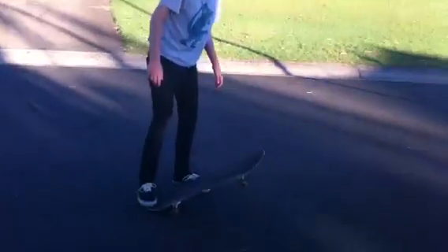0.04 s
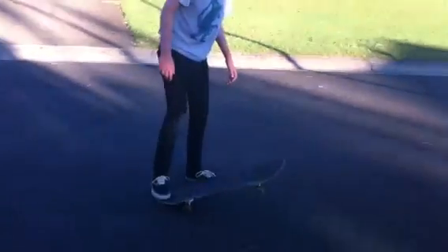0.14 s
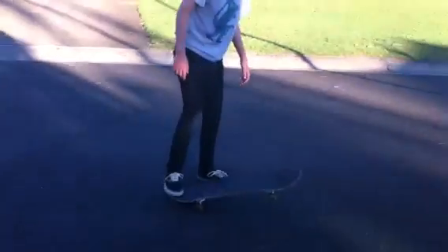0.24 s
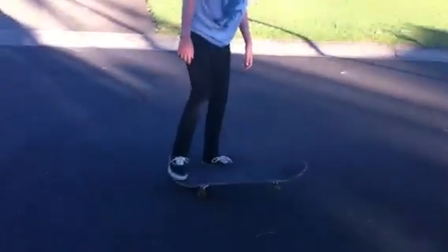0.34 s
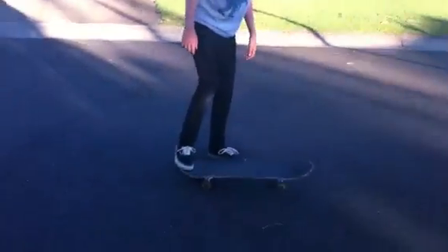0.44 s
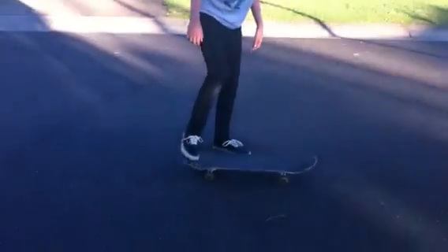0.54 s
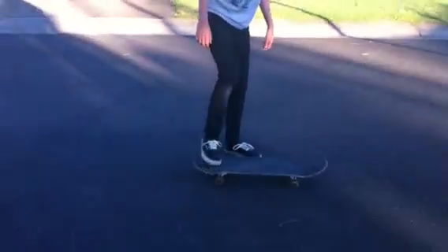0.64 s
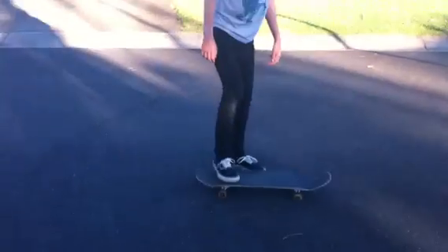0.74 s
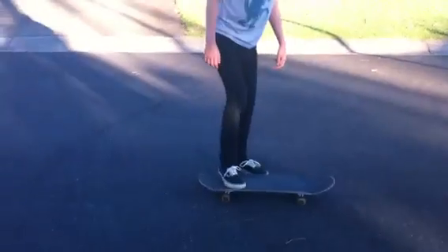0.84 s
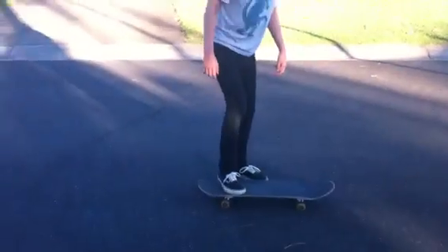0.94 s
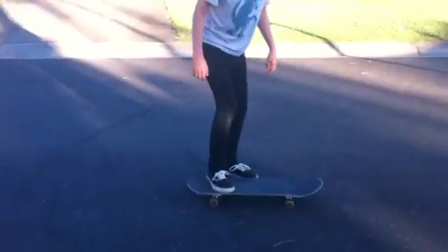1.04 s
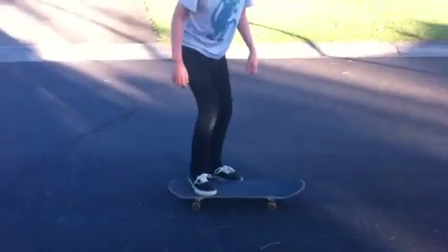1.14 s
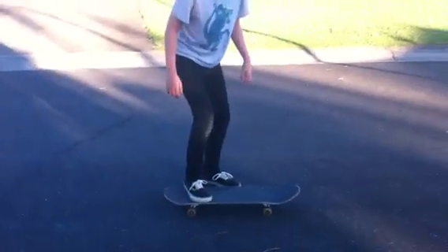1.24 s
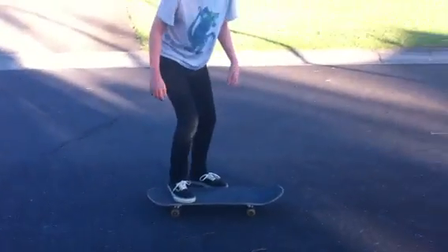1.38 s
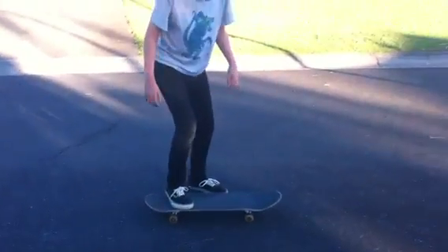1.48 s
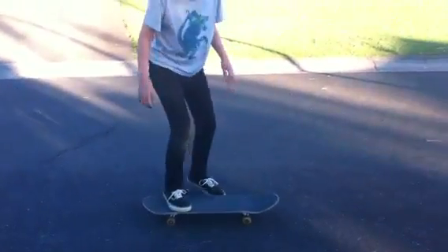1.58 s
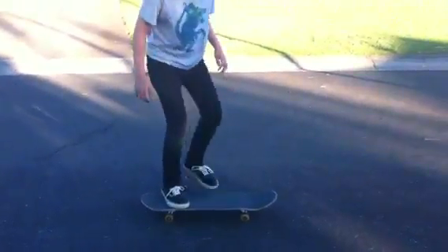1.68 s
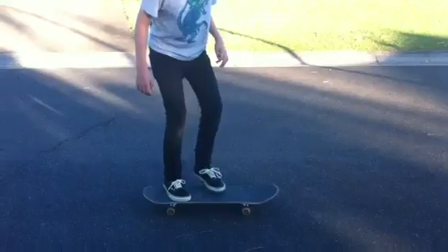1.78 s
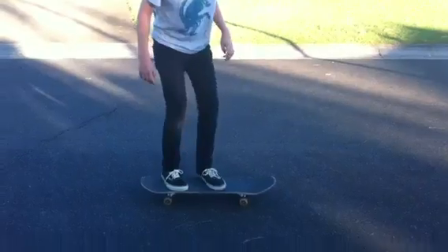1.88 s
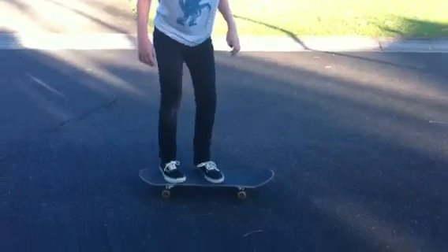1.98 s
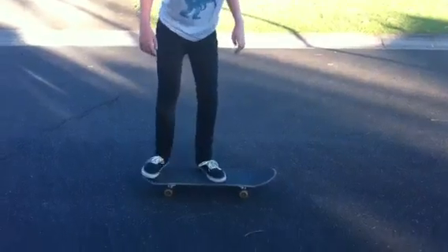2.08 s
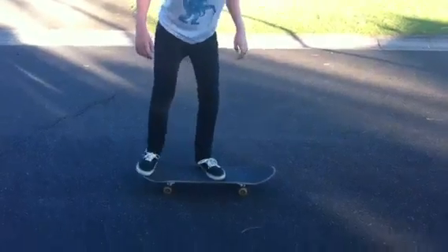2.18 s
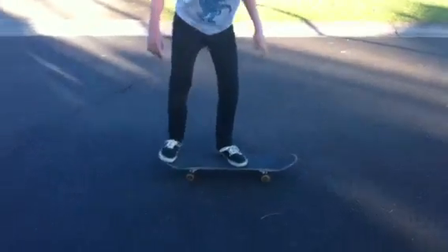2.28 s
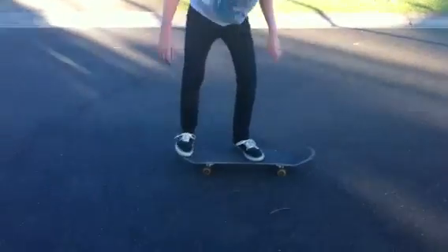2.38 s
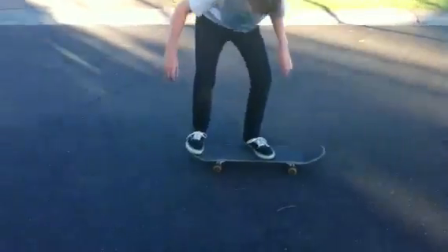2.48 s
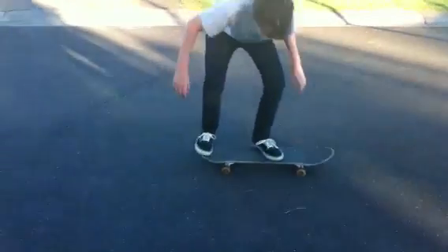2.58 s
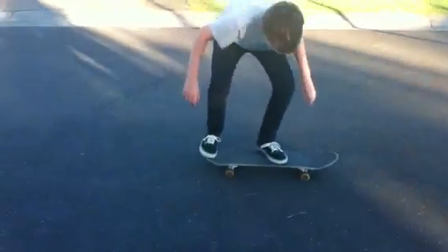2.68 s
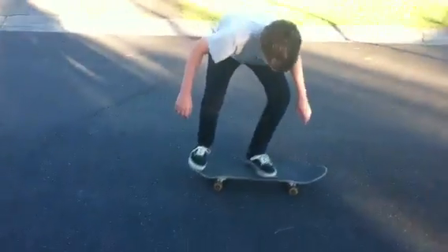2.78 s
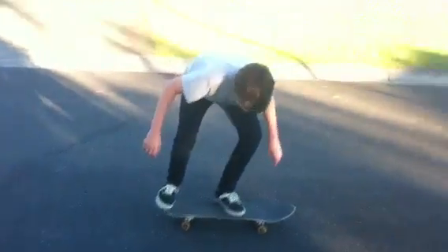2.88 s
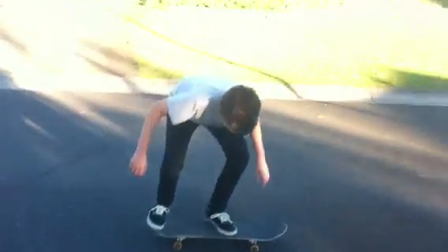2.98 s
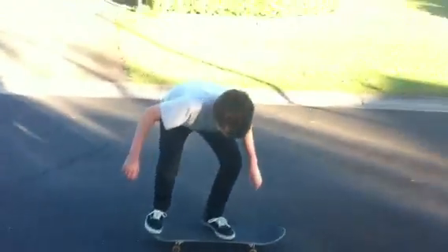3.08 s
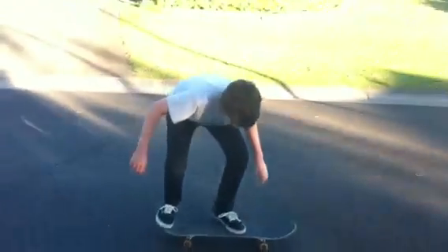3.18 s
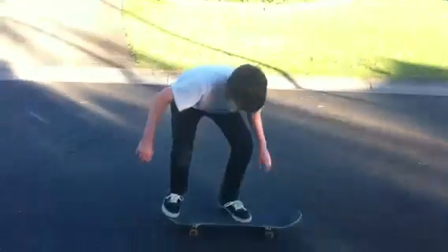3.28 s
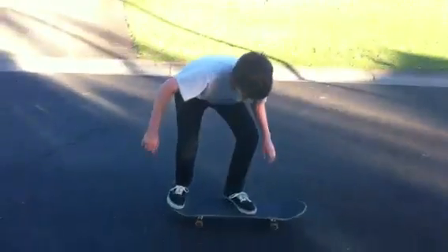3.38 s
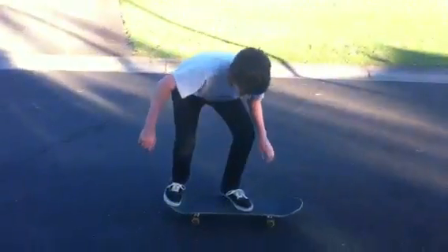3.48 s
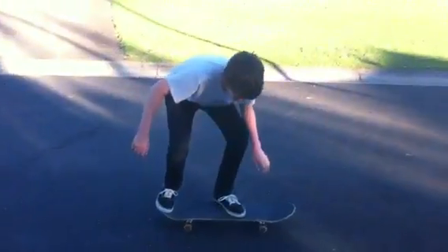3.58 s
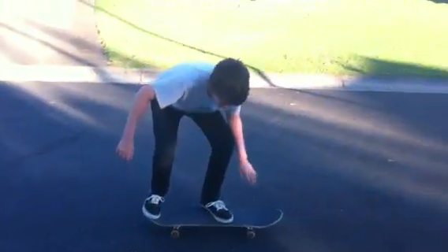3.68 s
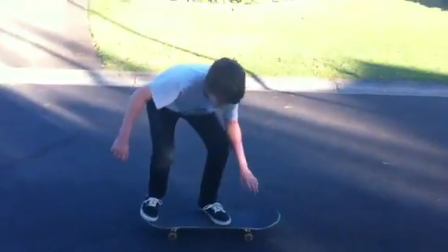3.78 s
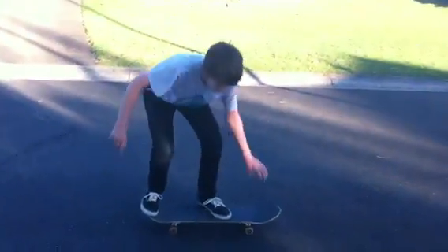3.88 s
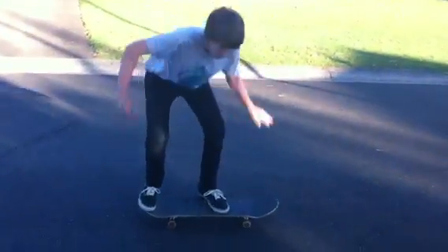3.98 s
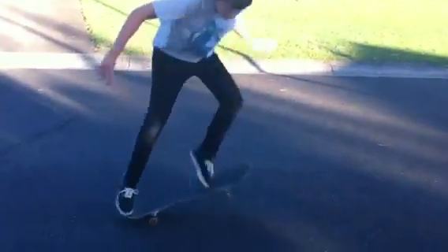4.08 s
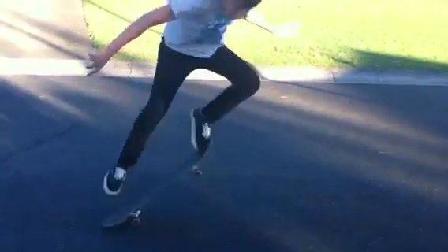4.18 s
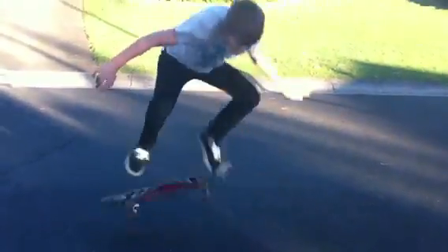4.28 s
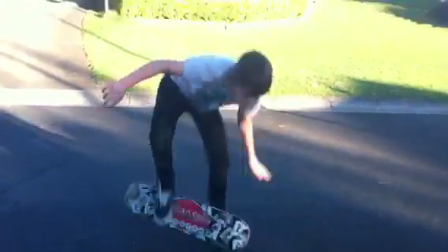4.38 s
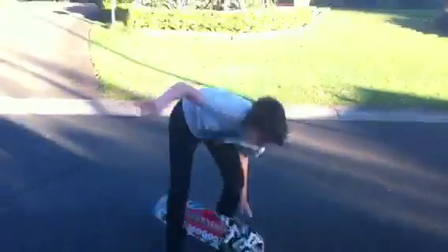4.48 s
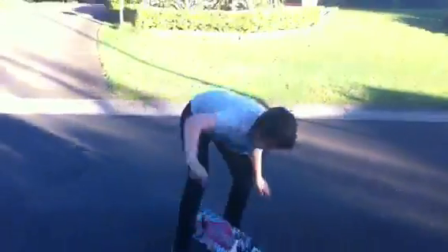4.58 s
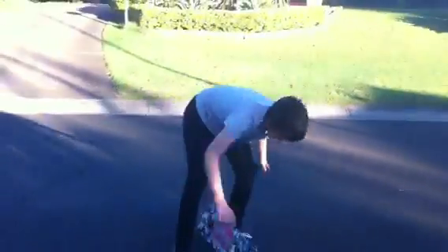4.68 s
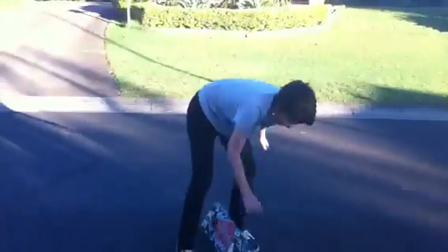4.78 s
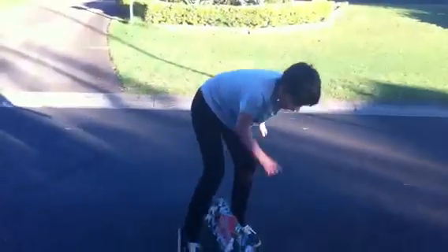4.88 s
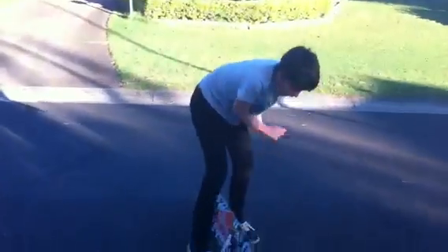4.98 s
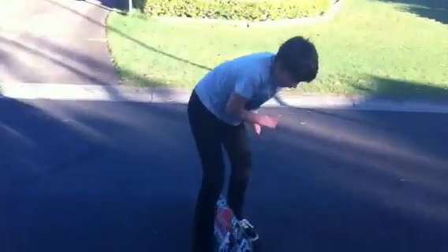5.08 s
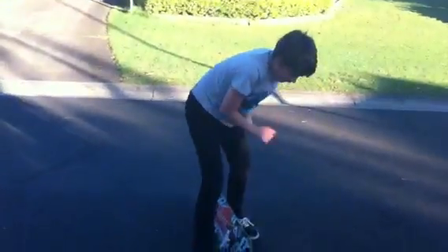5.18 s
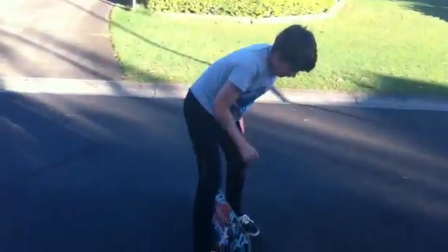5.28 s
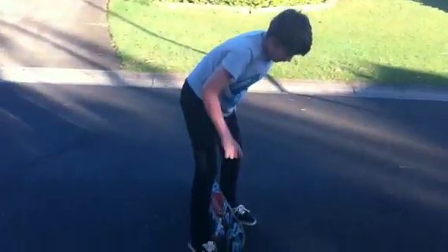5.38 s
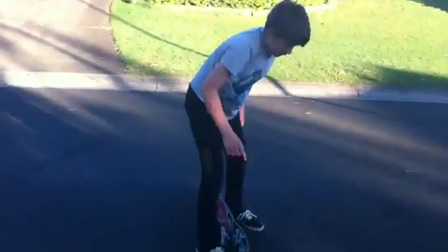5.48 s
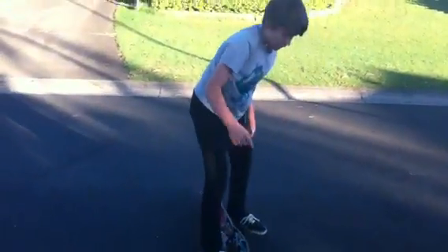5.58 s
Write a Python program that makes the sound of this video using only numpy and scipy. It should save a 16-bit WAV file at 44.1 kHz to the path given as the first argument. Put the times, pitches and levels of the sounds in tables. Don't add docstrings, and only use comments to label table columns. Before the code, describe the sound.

On a quiet street, a wooden clack, faint rolling and rubber squeaks lead to a scraping pop and a hard clattering board crash.

```python
import sys
import numpy as np
from scipy import signal
from scipy.fft import rfft, irfft
from scipy.io import wavfile

SR = 44100
rng = np.random.default_rng(int(sys.argv[2]) if len(sys.argv) > 2 else 0)


def rack_gain(trim_db):
    fader = np.asarray(trim_db, float)
    return 10 ** (fader / 20)


def generate_wav(sig):
    pcm = np.round(np.clip(np.atleast_2d(sig).T, -1, 1) * 32767).astype(np.int16)
    wavfile.write(sys.argv[1], SR, pcm)


N = 248633

# start_s, wood_peak_db, struck_pitch_hz, axle_clank_db (re wood), washer_tick_db (re wood)
HARD_BLOWS = [(0.6174, -19.5, 2208, -2, 3.5), (0.626, -32, 2330, 4, 7), (0.718, -36, 1150, -10, -5.5),
              (0.952, -38.5, 1100, -11, -2), (0.96, -31.5, 2425, -9, 1.5), (1.015, -34, 980, 0, 0.5),
              (1.993, -33.5, 1290, -13, -37.5), (2.244, -26.5, 2186, -14.5, -10),
              (4.152, -32, 1240, -3.5, -1.5), (4.288, -33, 665, -18.5, -2), (4.296, -21, 1474, -25, -20),
              (4.301, -23.5, 1480, -16.5, -13), (4.5, -11.5, 1480, -7.5, -3.5), (4.511, -23, 1140, -15, -5),
              (4.612, -30, 1230, 0, -5.5), (4.735, -15, 1020, -5.5, -6.5), (4.7584, -20.5, 1480, 5.5, -3),
              (4.815, -37, 1470, 6.5, 3.5)]
# start_s, wood_peak_db, struck_pitch_hz, axle_clank_db, washer_tick_db
REBOUND_KNOCKS = [
    (0.649, -34, 1410, -2, -3),
    (4.63, -27.5, 920, -31, -29),
    (5.004, -44, 905, -19, -5),
]
# start_s, wood_peak_db, struck_pitch_hz, washer_tick_db (re wood)
TRUCK_JIGGLES = [(0.633, -42, 2300, 9), (0.638, -46.5, 2370, 9.5), (0.656, -51, 2300, 8),
                 (.662, -40.5, 2350, 2), (.672, -51, 2300, 8), (.735, -48, 2100, -2), (.97, -50, 2400, 2),
                 (1.006, -63, 1000, 3), (4.229, -44, 1500, -3), (4.409, -47.5, 1200, -3.5),
                 (4.195, -49, 1100, -8), (4.259, -42.5, 2320, 2), (4.315, -42, 1500, 0),
                 (3.831, -60, 1500, 0), (2.04, -62, 2300, 7), (4.741, -34, 1900, -5),
                 (4.764, -32, 1710, -6), (0.801, -53, 1080, 13.5), (0.978, -46, 2280, 1),
                 (0.989, -44, 2300, -9), (0.997, -59, 2320, 4), (4.785, -35.5, 1500, 2),
                 (4.837, -45, 1200, -2), (4.803, -45, 1290, 5), (4.905, -54, 1300, 6),
                 (4.935, -42, 1200, -5), (4.956, -44, 2305, -14), (5.076, -56.5, 1000, -5),
                 (4.242, -45, 1000, 3.5), (1.021, -40, 2370, 0), (1.032, -49, 2400, -7),
                 (1.087, -47.5, 982, 7.5), (1.128, -52.5, 970, 5.5), (1.662, -43.5, 2270, 0.5),
                 (1.714, -46.5, 2240, 0.5), (4.167, -46, 638, 0), (4.333, -37, 1390, -14.5),
                 (4.428, -36.5, 1080, -4.5), (4.997, -41.5, 897, -0.5), (5.039, -45.5, 923, -2),
                 (5.05, -52, 899, -3), (5.165, -39.5, 930, -15)]
# start_s, wood_peak_db, struck_pitch_hz
DULL_TAPS = [(1.417, -46.5, 2040), (1.973, -54, 1990), (2.019, -61, 635), (2.876, -48, 2040),
             (2.96, -59, 2100), (3.074, -43.5, 2230), (3.818, -52, 595), (4.09, -52, 2290),
             (4.101, -50, 2340), (4.859, -41.5, 964), (4.888, -36.5, 1470), (4.434, -40, 1000),
             (4.992, -44, 1004), (4.795, -35, 1310)]
# pitch_hz, level_db, t60_s
DECK_MODES = [(558, -15.5, 0.018), (690, -14, .02), (886, -6.5, 0.013), (1020, -5, 0.026), (1150, 1, 0.027),
              (1302, 0, 0.02), (1480, 1, 0.03), (1680, 2, 0.027), (1720, 1, 0.025), (1900, 2, 0.014),
              (2040, -0.5, 0.0065), (2230, 7.5, 0.016), (2360, 5.5, .02), (2560, 1, .012)]
# pitch_hz, level_db, t60_s
AXLE_MODES = [(4810, -3, 0.012), (5240, -3, 0.0057), (5600, -9.5, 0.0047), (3500, -14, .005),
              (6200, -25, 0.0098)]
# pitch_hz, level_db, t60_s
WASHER_MODES = [(8700, -5.5, 0.014), (9030, -5.5, 0.0034), (8660, 3, 0.0042), (9100, 16, 0.0034),
                (11200, -3, 0.0029), (13900, -12.5, 0.0054)]
# start_s, peak_db, pitch_hz, t60_s, push_s
DECK_SLAPS = [(4.5, -9.5, 1570, 0.011, 0.0034), (4.5008, -10, 2030, 0.0078, 0.0031),
              (4.4996, -14, 1020, 0.021, 0.0031), (4.505, -18, 1100, 0.016, 0.0024),
              (4.734, -9, 952, 0.016, 0.00221), (4.734, -12, 1680, 0.0039, 0.0014),
              (4.735, -16.5, 2220, 0.0093, 0.0009), (4.744, -32, 1150, 0.052, 0.0049),
              (4.758, -27.5, 790, 0.022, 0.0035), (.619, -8.5, 2296, 0.011, 0.0031),
              (.627, -31, 2550, 0.0084, 0.0047), (.618, -28, 1280, 0.045, .004),
              (.961, -39.5, 1070, .025, 0.0028), (.961, -34, 1700, 0.013, 0.0027),
              (.952, -44.5, 680, 0.043, 0.0045), (.99, -48, 690, 0.074, 0.0046),
              (1.017, -35, 1030, .018, 0.0035), (1.133, -51, 1000, .05, .004),
              (4.167, -38.5, 2000, .012, 0.00298), (3.075, -48, 1300, .01, .002),
              (3.075, -51, 800, .012, .003), (4.515, -30, 1800, .15, .005), (4.52, -30, 920, .12, .005),
              (4.502, -20, 1400, .02, .003), (1.997, -40, 1420, 0.0093, 0.0033)]
# start_s, peak_db, pitch_hz, t60_s
DECK_BENDS = [(0.554, -56, 315, 0.25), (0.615, -44, 340, 0.024), (1.787, -48.5, 143.3, 0.042),
              (1.992, -39, 353, 0.013), (2.244, -51.5, 354, 0.054), (2.247, -37.5, 1130, 0.0056),
              (2.658, -35, 290, 0.066), (2.717, -47, 284, 0.04), (2.811, -47.5, 310, 0.04),
              (3.192, -50, 126, 0.044), (3.658, -52, 300, 0.12), (3.804, -39.5, 307, 0.11),
              (3.913, -53, 321, 0.14), (4.199, -45.5, 289, 0.1), (4.293, -45, 430, 0.063),
              (4.495, -29.5, 464, 0.077), (4.609, -34, 297, 0.035), (4.734, -32, 465, 0.097),
              (4.759, -32, 468, 0.052), (.617, -32.5, 690, 0.08), (1.016, -49, 690, 0.042),
              (1.994, -39, 585, 0.0056), (3.655, -47, 520, 0.0096), (4.501, -35, 187, 0.15),
              (4.501, -23, 584, 0.018), (4.737, -36.5, 258, 0.1), (4.739, -42.5, 179, 0.18),
              (2.66, -50, 470, .05), (2.78, -54, 540, .06), (2.93, -53, 330, .08), (3.02, -53, 310, .08),
              (3.81, -52, 480, .05), (2.246, -44, 700, .02)]
# start_s, peak_db, bright_end_db
BUSHING_SNAPS = [
    (3.501, -45.5, -3),
    (3.514, -45, -4),
    (3.521, -61.5, 11),
    (3.526, -43.5, -4),
    (3.538, -59, 9),
    (3.549, -47, -2),
    (0.416, -53, -4),
    (.432, -57, -1),
]
# pitch_hz, level_db, t60_s
BUSHING_MODES = [(1690, 0.5, 0.0064), (2146, 0, .005), (3600, -6, 0.0054), (5426, -2.5, .005),
                 (6050, -0.5, .005), (8980, -2.5, .004)]
# time_s, level_db
WHEEL_GRIND = [(0.0, -56), (0.27, -56), (0.75, -53.5), (1.06, -65), (1.69, -58.5), (2.1, -56), (2.6, -70),
               (2.87, -58), (3.14, -60), (3.5, -56.5), (3.8, -60), (4.0, -69), (4.6, -70), (5.1, -69),
               (5.3, -71), (5.64, -58)]
# time_s, level_db
BOARD_SKID = [(4.05, -90), (4.11, -64), (4.186, -47), (4.372, -46.5), (4.49, -54.5), (4.52, -32),
              (4.6, -40.5), (4.706, -53), (4.85, -41), (4.98, -56.5), (5.1, -68)]
# start_s, length_s, deck_hum_db, wood_scrape_db, air_grit_db
SCUFF_DRAGS = [(0.944, 0.037, -77, -66, -67), (2.14, 0.045, -92, -69, -66), (2.434, 0.28, -78, -72.5, -82),
               (2.64, 0.19, -57.5, -69.5, -74), (2.84, 0.28, -59.5, -73.5, -96),
               (3.654, 0.093, -58, -71, -95), (3.82, 0.13, -58, -88, -95), (4.093, 0.11, -77, -81, -63),
               (4.18, 0.096, -54.5, -58, -60.5), (4.232, 0.056, -68, -65, -47.5),
               (4.282, 0.07, -71, -63, -48.5), (4.827, 0.07, -57, -56, -60.5), (4.997, 0.06, -71, -72, -73),
               (5.167, 0.033, -65, -64, -70), (5.542, 0.087, -67.5, -70.5, -69)]
# pitch_hz, level_db (per Hz)
GRIT_SPECTRUM = [(88, -34.5), (150, -20), (297, -0.5), (702, -5.5), (837, 2.5), (1190, 3), (1560, -3.5),
                 (2180, -1), (3100, -19), (4080, -19.5), (5250, -13.5), (6910, -23), (9440, -15),
                 (11000, -22), (16000, -32.5)]
# pitch_hz, width_hz, level_db
DECK_HUM = [(209.2, 57, 1), (269.8, 120, -9.5), (330, 240, -5), (435, 55, -12)]
# pitch_hz, width_hz, level_db
DECK_SHUDDER = [(900, 79, -0.5), (1200, 140, -3.5), (1452, 24, 1), (1790, 130, -5.5), (2100, 27, -5)]
# time_s, slip_rate_hz, level_db, overtones_db
HEEL_TWIST = [
    (1.75, 1926, -70, -20),
    (1.785, 2005, -67, -17),
    (1.795, 2260, -62, -8),
    (1.805, 2500, -46.5, -4),
    (1.815, 2780, -62, 12.5),
    (1.828, 2860, -64, 3),
    (1.865, 2870, -74, 2),
    (1.9, 2850, -78, -8),
]
# time_s, slip_rate_hz, level_db, overtones_db
SHOE_DRAG = [
    (2.326, 3950, -60, -12),
    (2.336, 3860, -40, -7),
    (2.388, 3990, -49, -9.5),
    (2.42, 3920, -55, -10),
    (2.5, 4020, -45, -23),
    (2.535, 3920, -65, -11),
    (2.7, 3780, -71, -17),
    (2.77, 3940, -91, -12),
]
# start_s, length_s, first_slip_rate_hz, last_slip_rate_hz, peak_db
RUBBER_PIPS = [(2.503, .032, 1950, 2280, -63), (2.552, .014, 2700, 2800, -66),
               (2.56, .022, 2500, 2480, -61), (2.582, .024, 3650, 3420, -62), (2.6, .024, 2700, 2650, -61),
               (2.628, .045, 2130, 2450, -62), (2.672, .03, 2900, 2800, -63), (2.712, .05, 2960, 2950, -60),
               (2.758, .028, 2920, 2650, -63), (2.664, .032, 3750, 3750, -62),
               (2.69, .045, 1900, 1900, -64), (2.78, .03, 2520, 2300, -66), (3.592, .026, 2150, 2100, -61),
               (3.62, .018, 5450, 5400, -66), (3.635, .025, 2600, 2750, -65)]
# start_s, length_s, first_slip_rate_hz, last_slip_rate_hz, peak_db
RUBBER_SQUEALS = [
    (2.208, .045, 2050, 2350, -55),
    (2.25, .085, 2330, 3020, -54),
    (2.275, .055, 2480, 2680, -55),
    (2.33, .06, 2900, 3050, -60),
    (2.37, .06, 2520, 2720, -58),
    (2.39, .1, 2850, 3080, -61),
]
# start_s, length_s, first_slip_rate_hz, last_slip_rate_hz, peak_db
RUBBER_HISSES = [(2.255, .048, 3250, 3550, -57), (2.222, .016, 3150, 3150, -60),
                 (2.312, .03, 4400, 4300, -63), (2.335, .06, 2300, 2500, -62), (2.27, .07, 3000, 3250, -61),
                 (2.33, .16, 3100, 3250, -63), (2.33, .13, 5300, 5900, -64), (2.25, .08, 4100, 4300, -67),
                 (4.1, .2, 1500, 1800, -61.5), (4.088, .06, 1900, 1900, -61), (4.09, .05, 3450, 3400, -66),
                 (4.15, .11, 2300, 2400, -58)]
# start_s, length_s, first_pitch_hz, last_pitch_hz, peak_db
WHEEL_WHINES = [(.37, .3, 2350, 2250, -69), (.17, .3, 5000, 4850, -68), (.4, .22, 4900, 4800, -72),
                (.08, .14, 3000, 3400, -72), (0, .12, 5700, 5600, -73), (1.2, .45, 2300, 2300, -70),
                (2, .15, 5800, 5900, -70), (2.8, .35, 2100, 1950, -65), (3.28, .25, 2350, 2150, -64),
                (3.58, .16, 2200, 2350, -67), (3.99, .11, 4500, 4700, -70), (4.02, .2, 5750, 6150, -64),
                (1.805, .05, 3750, 3500, -70)]
# pitch_hz, level_db (per Hz)
STREET_SPECTRUM = [(20, -35.5), (45, -36.5), (75, -14), (130, -3), (200, 1), (300, -6), (600, -9),
                   (1000, -8), (2200, -14.5), (3000, -20.5), (4800, -20.5), (7000, -23.5), (9500, -27.5),
                   (15500, -25), (16500, -43.5)]
# time_s, level_db
STREET_SWELL = [
    (0, 11.5),
    (1.2, 11.5),
    (2.2, 11.5),
    (2.9, 13.5),
    (3.3, 11),
    (4.0, 12),
    (4.4, 13),
    (4.9, 7.5),
    (5.3, 9),
    (5.64, 8),
]
# pitch_hz, width_hz, dip_db
PHONE_DIPS = [(3140, 350, -45), (6870, 4800, -3), (6900, 430, -9.5), (3850, 800, -4)]

BLOW_MS, HARDER_MS_PER_DB, REBOUND_MS, JIGGLE_MS, TAP_MS = 5.12, 0.17, 2.5, 5.2, 5
JIGGLE_CLANK_DB, TAP_CLANK_DB, TAP_TICK_DB = -6.5, -26, -16.5
ROLL_WOOD_DB, ROLL_AIR_DB, ROLL_WOOD_SHARE, ROLL_AIR_SHARE = -74, -76.5, 0.14, 0.55
SKID_HUM_DB, SKID_WOOD_DB, SKID_AIR_DB = -16, -9, -16.5
# peak at this share of its length, fade-in dB, fade-out dB, overtones dB, wobble
PIP_HABIT, SQUEAL_HABIT = (.5, 5, 5, -16, .25), (.55, 5, 7, -4, .75)
HISS_HABIT, WHINE_HABIT = (.4, 6, 6, -17.5, 1.2), (.55, 12, 11, -25, 1.2)
TWIST_WOBBLE, DRAG_WOBBLE = 0.57, 0.83
STREET_DB = -73.5
ECHO_T60_S, ECHO_DB, ECHO_CUT_HZ = 0.5, -29, 4000
BASS_CUT_HZ, TOP_HZ = 208, 16500


def contacts():
    blows = [(*row, BLOW_MS + HARDER_MS_PER_DB * (row[1] + 25)) for row in HARD_BLOWS]
    rebounds = [(*row, REBOUND_MS) for row in REBOUND_KNOCKS]
    jiggles = [(s, db, hz, JIGGLE_CLANK_DB, tick_db, JIGGLE_MS) for s, db, hz, tick_db in TRUCK_JIGGLES]
    taps = [(*row, TAP_CLANK_DB, TAP_TICK_DB, TAP_MS) for row in DULL_TAPS]
    return blows + rebounds + jiggles + taps


def knocks(reach_oct=1.3, scatter_db=6.5, metal_share=0.6, struck_db=-3, held_db=-9):
    out, t = np.zeros(N), np.arange(SR // 10) / SR
    luck = rng.standard_normal((len(contacts()), 4, len(t) // 4))
    for row, (rough, grind, shake, spread) in zip(contacts(), luck):
        s, peak_db, struck_hz, clank_db, tick_db, contact_ms = row
        phase = t / (contact_ms / 1000)
        press = phase ** 2 * np.exp(-4.0 * phase) * np.resize(rough, len(t))
        jolt = phase * np.exp(-3.0 * phase / metal_share)

        wood = np.zeros(len(t))
        for (hz, db, t60), u, v in zip(DECK_MODES, spread, spread[50:]):
            far_db = min(12 * (np.log2(hz / struck_hz) / reach_oct) ** 2, 15)
            wood += ring(press, hz * (1 + 0.01 * v), t60) * rack_gain(db + scatter_db * u - far_db)

        swell = phase ** 1.8 * np.exp(-1.6 * phase ** 2)
        sung = peak_one(swell * np.sin(2 * np.pi * struck_hz * t))
        sung_db = struck_db + 17.0 * np.log2(struck_hz / 1400) + 0.22 * (peak_db + 19.0)
        wood = peak_one(wood) + rack_gain(sung_db) * sung
        wood = wood * (rack_gain(held_db) + np.exp(-(phase / 0.46) ** 3))

        clank = ring_all(jolt * np.resize(grind, len(t)), AXLE_MODES)
        tick = ring_all(jolt * np.resize(shake, len(t)), WASHER_MODES)
        knock = peak_one(wood) + rack_gain(clank_db) * peak_one(clank) + rack_gain(tick_db) * peak_one(tick)
        add(out, s - .001, rack_gain(peak_db) * knock)
    return out


def thuds(push_s=0.0093):
    out, t = np.zeros(N), np.arange(SR // 5) / SR
    shifts = [(*row, push_s, .5) for row in DECK_BENDS]
    slaps = [(*row, 0.15) for row in DECK_SLAPS]
    for s, peak_db, hz, t60, press_s, lower in shifts + slaps:
        push = np.sin(2 * np.pi * hz * t) * np.sin(np.pi * np.minimum(t / press_s, 1)) ** 2
        bend = ring(push, hz, t60) + lower * ring(push, 0.54 * hz, 0.72 * t60)
        add(out, s - .002, rack_gain(peak_db) * peak_one(bend))
    return out


def grit(per_s=5000, size_db=2.5, split_hz=3300):
    roll_db, skid = in_time(WHEEL_GRIND), rack_gain(in_time(BOARD_SKID))
    _, peak_db, struck_hz, clank_db, tick_db, _ = np.transpose(contacts())

    hits = rng.random((2, N)) < per_s / SR
    sizes = rack_gain(size_db * np.minimum(rng.exponential(1, (2, N)), 5))
    low, high = hits * sizes * rng.choice([-1, 1], (2, N))
    wood_band = signal.butter(4, [250, split_hz], "band", fs=SR, output="sos")
    air_band = signal.butter(4, split_hz, "high", fs=SR, output="sos")
    wood = signal.sosfilt(wood_band, colour(low, GRIT_SPECTRUM))
    air = signal.sosfilt(air_band, colour(high, GRIT_SPECTRUM))

    shove = rng.standard_normal(N) * rack_gain(2.0 * drift(13, N))
    hum = sum(rack_gain(db) * rms_one(ring(shove, hz, 1.7 / width)) for hz, width, db in DECK_HUM)
    shudder = sum(rack_gain(db) * rms_one(ring(wood, hz, 2.0 / width)) for hz, width, db in DECK_SHUDDER)

    hum_gain = rack_gain(roll_db - 8.5) + rack_gain(SKID_HUM_DB) * skid + drags(column=2)
    wood_gain = rack_gain(ROLL_WOOD_DB + ROLL_WOOD_SHARE * (roll_db + 60.5)) + rack_gain(SKID_WOOD_DB) * skid
    wood_gain += drags(column=3)
    wood_gain += rattle(1.07 * peak_db - 14.5 - 4.7 * np.log2(struck_hz / 1400), t60=0.063)
    wood_gain += rattle(peak_db - 40.5, t60=0.19)
    air_gain = rack_gain(ROLL_AIR_DB + ROLL_AIR_SHARE * (roll_db + 62.5)) + rack_gain(SKID_AIR_DB) * skid
    air_gain += drags(column=4)
    air_gain += rattle(1.09 * peak_db + np.maximum(clank_db, tick_db) - 19.0, t60=0.058)
    air_gain += rattle(peak_db + tick_db - 40.0, t60=0.22)
    air_gain *= rack_gain(2.5 * drift(45, N))

    shaken = rattle(peak_db - 33.5, t60=0.26) * rms_one(shudder)
    lumps = rack_gain(2.0 * drift(25, N))
    scraped = lumps * (shaken + wood_gain * rms_one(wood) + air_gain * rms_one(air))
    return hum_gain * rms_one(hum) + scraped


def drags(column, edge_s=0.0055):
    gain = np.zeros(N)
    for row in SCUFF_DRAGS:
        t = np.arange(0, row[1], 1 / SR)
        edges = np.minimum(t / edge_s, (t[-1] - t) / (3.4 * edge_s))
        add(gain, row[0], rack_gain(row[column]) * np.minimum(edges, 1))
    return gain


def rattle(level_db, t60):
    kicks = np.zeros(N)
    kicks[[round((row[0] + .002) * SR) for row in contacts()]] = rack_gain(level_db)
    return signal.lfilter([1], [1, -rack_gain(-60 / (t60 * SR))], kicks + 1e-18)


def slips():
    tracks = [[(*row, TWIST_WOBBLE) for row in HEEL_TWIST], [(*row, DRAG_WOBBLE) for row in SHOE_DRAG]]
    kinds = [(RUBBER_PIPS, PIP_HABIT), (RUBBER_SQUEALS, SQUEAL_HABIT),
             (RUBBER_HISSES, HISS_HABIT), (WHEEL_WHINES, WHINE_HABIT)]
    for rows, (share, in_db, out_db, over_db, wobble) in kinds:
        for s, length, hz, last_hz, db in rows:
            tracks.append([(s + at * length, hz + at * (last_hz - hz), db - fade_db, over_db, wobble)
                           for at, fade_db in [(0, in_db), (share, 0), (1, out_db)]])
    return tracks


def squeaks(wobble_hz=185):
    out = np.zeros(N)
    for rows in slips():
        s, *columns = np.transpose(rows)
        t = np.arange(s[0], s[-1], 1 / SR)
        hz, level_db, over_db, wobble = [np.interp(t, s, c) for c in columns]
        wide = max(wobble.mean(), 1)
        wobble = np.clip(wobble, 0, 1)
        phase = 2 * np.pi * np.cumsum(hz) / SR
        for k, gain in [(1, 1), (2, rack_gain(over_db)), (3, rack_gain(over_db - 7.5))]:
            narrow = signal.butter(3, wide * wobble_hz * k ** 0.44, fs=SR, output="sos")
            smear = rms_one(signal.sosfilt(narrow, rng.standard_normal((2, SR))))
            u, v = smear[:, 2000:2000 + len(t)]
            pure = np.sqrt(2) * np.sin(k * phase)
            smeared = u * np.sin(k * phase) + v * np.cos(k * phase)
            line = (1 - wobble) * pure + wobble * smeared
            add(out, s[0], rack_gain(level_db) * gain * line * signal.windows.tukey(len(t), 0.3))
    return out


def creaks():
    out = np.zeros(N)
    for hz, db, t60 in BUSHING_MODES:
        clicks = np.zeros(N)
        for s, peak_db, bright_db in BUSHING_SNAPS:
            clicks[round(s * SR)] = rack_gain(peak_db + db + bright_db * (hz > 4500))
        out += ring(clicks, hz, t60)
    return out


def echoes(x):
    t = np.arange(SR // 2) / SR
    haze = rng.standard_normal(len(t)) * rack_gain(-60 * t / ECHO_T60_S) * np.minimum(t / 0.051, 1)
    haze = signal.sosfilt(signal.butter(1, ECHO_CUT_HZ, fs=SR, output="sos"), haze)
    return rack_gain(ECHO_DB) * signal.fftconvolve(x, haze / np.sqrt(np.sum(haze ** 2)))[:N]


def street():
    s, gain_db = np.transpose(STREET_SWELL)
    level_db = STREET_DB + np.interp(np.arange(N) / SR, s, gain_db) + 0.75 * drift(0.78, N)
    return rack_gain(level_db) * colour(rng.standard_normal(N), STREET_SPECTRUM)


def handset(x):
    x = signal.sosfilt(signal.butter(4, BASS_CUT_HZ, "high", fs=SR, output="sos"), x)
    for hz, width_hz, dip_db in PHONE_DIPS:
        b, a = signal.iirpeak(hz, hz / width_hz, fs=SR)
        x = x - (1 - rack_gain(dip_db)) * signal.lfilter(b, a, x)
    return x


def ring(push, hz, t60):
    r, w = rack_gain(-60 / (t60 * SR)), 2 * np.pi * hz / SR
    return signal.lfilter([0, np.sin(w)], [1, -2 * r * np.cos(w), r * r], push + 1e-18)


def ring_all(push, modes):
    return sum(ring(push, hz, t60) * rack_gain(db) for hz, db, t60 in modes)


def colour(x, points):
    hz = np.maximum(np.fft.rfftfreq(len(x), 1 / SR), 1)
    at, level_db = np.transpose(points)
    return rms_one(irfft(rfft(x) * rack_gain(np.interp(np.log(hz), np.log(at), level_db)), len(x)))


def drift(rate, size):
    r = np.exp(-2 * np.pi * rate / SR)
    slow = signal.lfilter([1], [1, -2 * r, r * r], rng.standard_normal(size + 9000))[9000:]
    return rms_one(slow - slow.mean())


def in_time(rows):
    return np.interp(np.arange(N) / SR, *np.transpose(rows), right=-200)


def rms_one(x):
    return x / np.sqrt(np.mean(x ** 2) + 1e-20)


def peak_one(x):
    return x / (np.max(np.abs(x)) + 1e-20)


def add(out, s, x):
    i = max(round(s * SR), 0)
    out[i:i + len(x)] += x[:len(out) - i]


def scene():
    knocked = handset(knocks()) + creaks()
    bent = signal.sosfilt(signal.butter(2, 100, "high", fs=SR, output="sos"), thuds())
    slipped = squeaks()
    echoed = echoes(knocked + slipped + rack_gain(-2.5) * bent)
    return (knocked + bent + slipped + echoed + handset(grit()) + street())[None]


def low_pass(x):
    return signal.sosfilt(signal.butter(12, 17150, fs=SR, output="sos"), x)


def record(dry):
    steady = signal.sosfilt(signal.butter(1, 20, "high", fs=SR, output="sos"), dry)
    steady = signal.sosfilt(signal.cheby2(10, 50, TOP_HZ + 300, fs=SR, output="sos"), steady)
    return low_pass(steady)


dry = scene()
out = record(dry)
generate_wav(out)
```